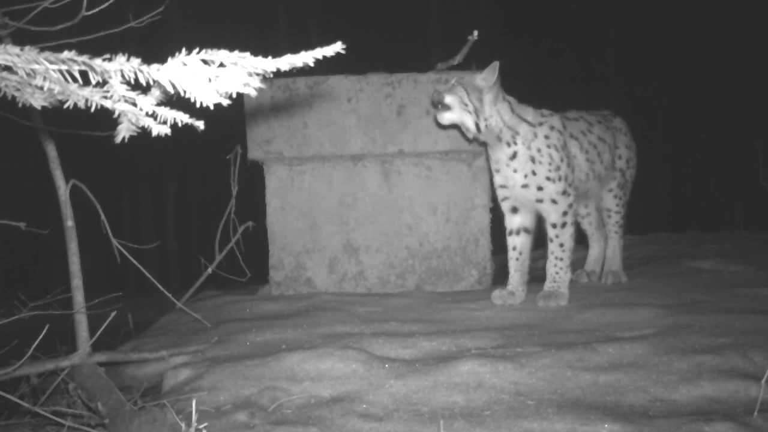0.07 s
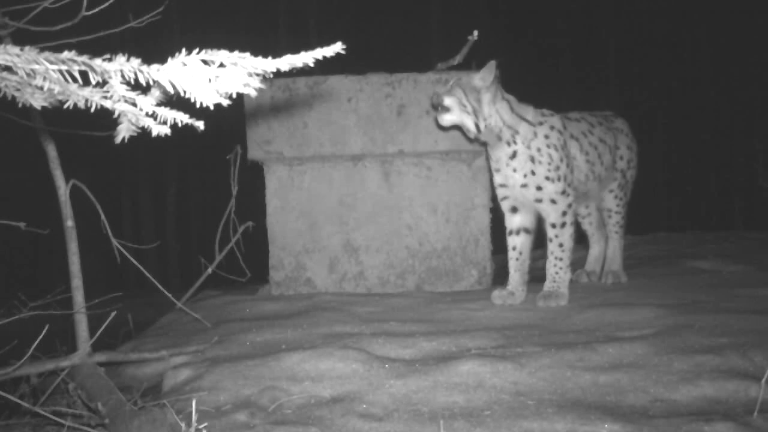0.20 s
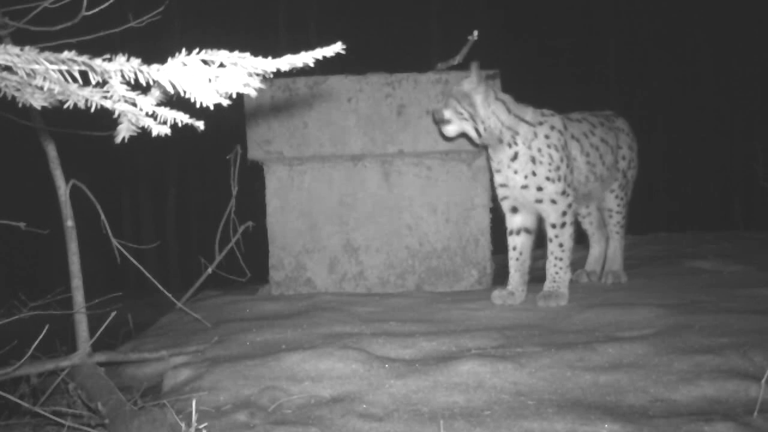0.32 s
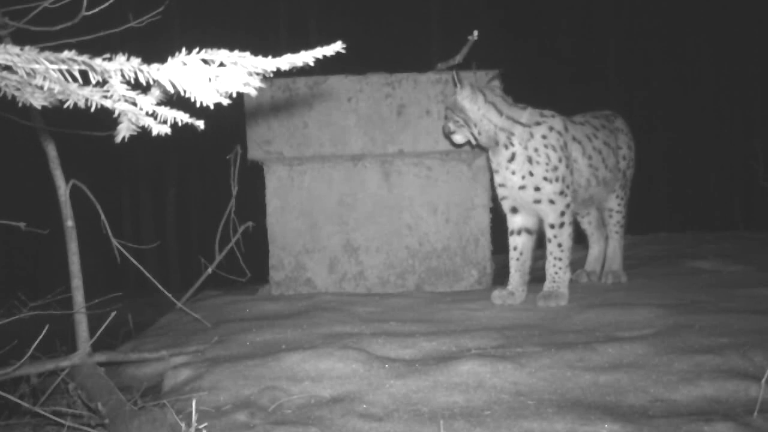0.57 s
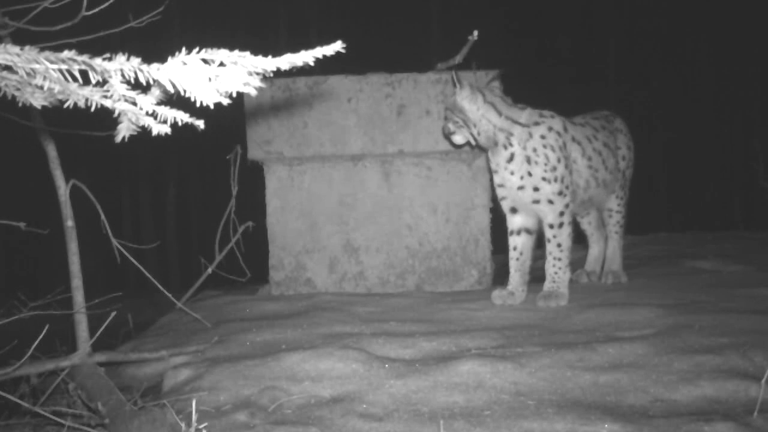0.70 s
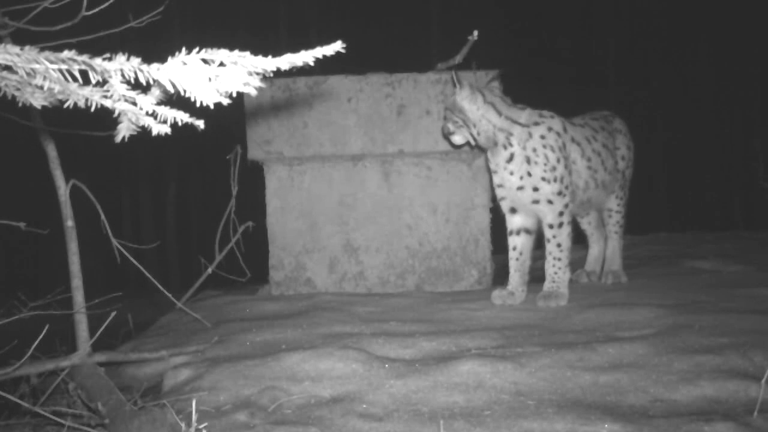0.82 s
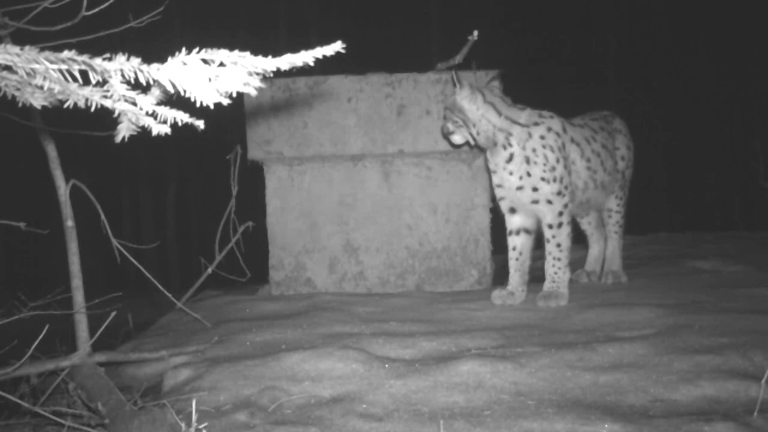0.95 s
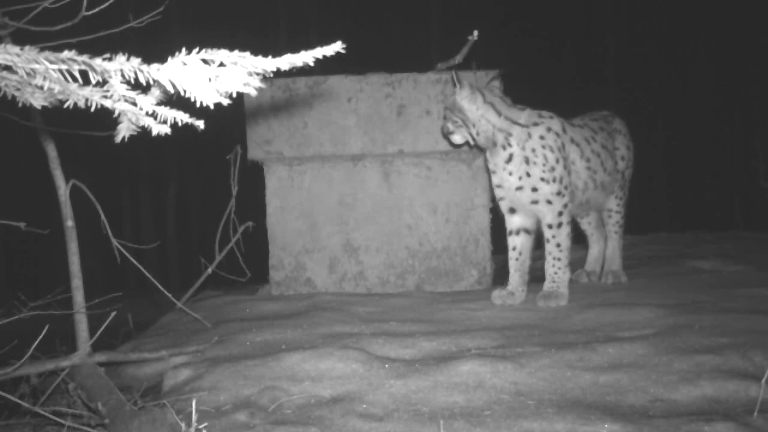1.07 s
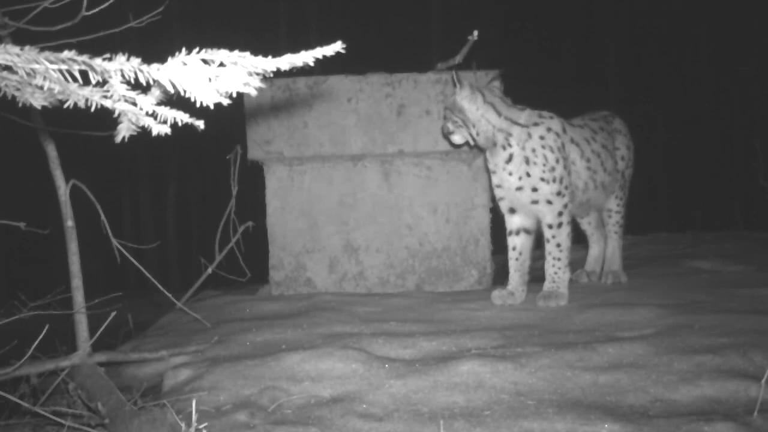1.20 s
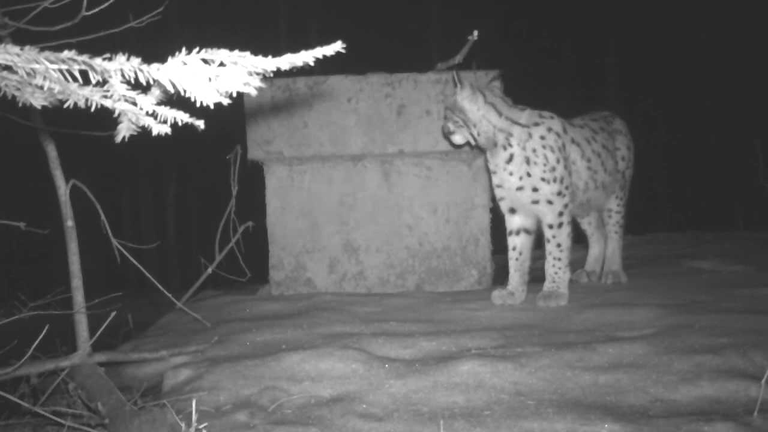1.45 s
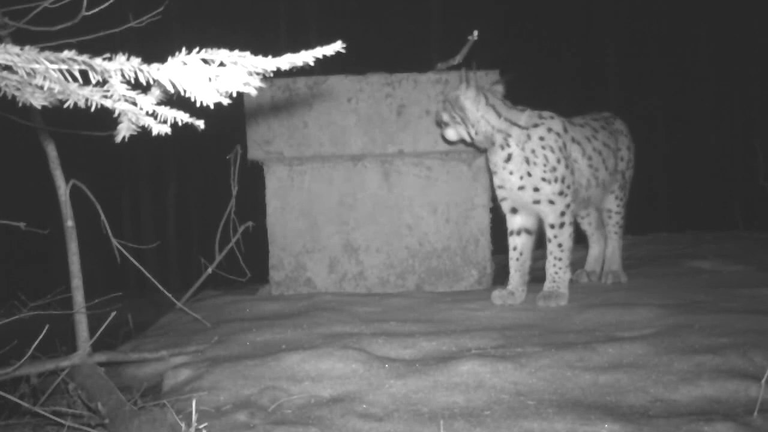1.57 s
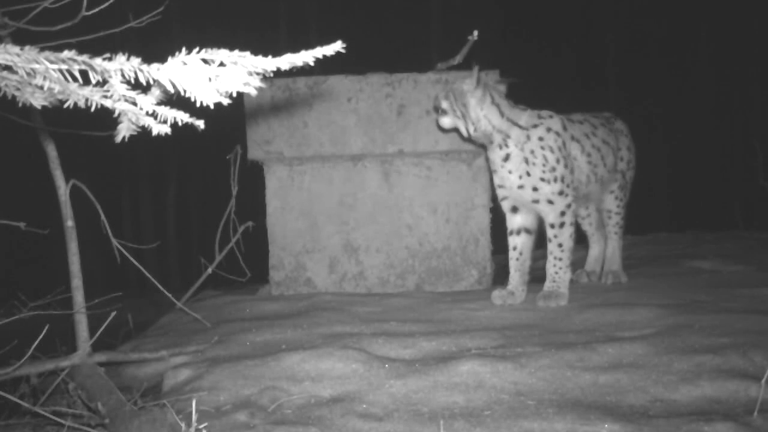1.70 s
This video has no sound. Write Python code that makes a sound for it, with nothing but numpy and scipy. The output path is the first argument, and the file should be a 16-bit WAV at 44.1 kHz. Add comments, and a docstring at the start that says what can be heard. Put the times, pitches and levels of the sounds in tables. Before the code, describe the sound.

A lynx gives one short, hoarse call close to the microphone, outdoors at night. It rises, breaks into a rasp, then sinks and fades on a brief clear note. Steady hiss and soft, rapid electronic ticks run throughout.

```python
"""A lynx gives one hoarse call at night, close to a trail camera.
Its vocal folds chop its breath into uneven puffs, which ring in its throat and mouth.
The voice rises, breaks into a rasp with a thin whistle, then sinks and clears as the mouth closes.
The camera's electronics hiss and tick softly, about eight down-and-up pairs of ticks a second."""
import sys
import numpy as np
from scipy import signal
from scipy.fft import rfft, irfft
from scipy.io import wavfile
from scipy.ndimage import uniform_filter1d

SR = 44100
rng = np.random.default_rng(int(sys.argv[2]) if len(sys.argv) > 2 else 0)


def waveform_to_disk(signal):
    """Save audio, clipped to [-1, 1], as 16-bit WAV at the path in sys.argv[1]."""
    frames = np.transpose(np.atleast_2d(signal))
    scaled = np.clip(frames, -1, 1) * 32767
    samples = np.round(scaled).astype(np.int16)
    wavfile.write(sys.argv[1], SR, samples)


N = 77175
TIME = np.arange(N) / SR

# Tone of the hiss, low to high: frequency_hz, relative_db
HISS_TONE = [(20, 20), (60, 8.5), (120, 13), (250, 8), (500, 5), (1000, 2), (2000, 0.5), (4000, -2),
             (5500, -5), (6600, -8), (8200, -10)]
# The two repeating electrical steps: start_s, direction (-1 down, 1 up), level_db
TICK_STEPS = [(.0468, -1, -33.5), (0.0872, 1, -31)]
# Pitch of the voice: time_s, pitch_hz
VOICE_PITCH = [(.18, 255.2), (.21, 293), (.24, 380.6), (.283, 422.1), (.296, 580), (.35, 554.1),
               (.43, 497.5), (.47, 427), (.5, 409.9), (.55, 383), (.6, 349), (.65, 330)]
# How hoarse the voice is: time_s, roughness (0 to 1)
ROUGHNESS = [(.17, .7), (.24, .55), (.31, .48), (.36, 0.7), (.45, .6), (.49, 0.5), (.54, .58), (.59, 0.4),
             (.66, 0.4)]
# A second vibration of the folds as the voice breaks: time_s, pitch_hz, relative_db
SECOND_VOICE = [(.28, 427.7, -16), (.31, 421.6, -3.5), (.335, 385, -8.5), (.37, 370.6, -4.5),
                (.46, 360.7, -3), (.485, 345, -10)]
# Strength of the main part of the call: time_s, level_db
CALL_LEVEL = [(.15, -65), (.176, -44.5), (.19, -32.5), (.238, -19), (.276, -22), (.283, -14.5),
              (.324, -16.5), (.344, -19.5), (.4, -22.5), (.424, -21), (.456, -27), (.495, -24.5),
              (.515, -31.5), (.565, -31.5), (.6, -32), (.63, -40.5), (.66, -55.5)]
# Strength of the call's treble: time_s, level_db
TREBLE_LEVEL = [(.17, -75.5), (.24, -53), (.32, -44.5), (.42, -50), (.47, -51), (.55, -55.5), (.66, -65)]
# How far the mouth is open: time_s, opening (0 to 1)
MOUTH_OPENING = [(.16, 0.6), (.205, 0.54), (.245, 0.58), (.3, 0.92), (.4, 0.96), (.5, 0.19), (.56, 0.46),
                 (.6, 0.04)]
# Where the throat rings: frequency_hz, width_hz, mouth_open_db, mouth_closed_db
THROAT_RINGS = [(1096, 30, -7, -31), (1257, 41, -11, -7), (1344, 37, 4.5, -25.5), (1419, 80, 0.5, -8.5),
                (1495, 81, -1.5, -4.5), (1698, 115, 1, -5), (1765, 32.5, 0, 4.5), (1926, 58, -0.5, -10),
                (2030, 49, 2.5, -11.5), (2095, 55, -22, -19.5)]
# The bright, gliding ring of the mouth: time_s, frequency_hz, relative_db
MOUTH_RING = [(.19, 2780, -29), (.26, 2670, -16), (.305, 2684, -12), (.34, 2430, -4.5), (.42, 2396, -9),
              (.5, 2405, -14), (.55, 2450, -13.5), (.59, 2380, -30)]
# Where the voice rings in the treble: frequency_hz, width_hz, relative_db
TREBLE_RINGS = [(3624, 360, -2.5), (4580, 410, -7), (5120, 170, -2), (5470, 110, 3), (6010, 250, -2.5),
                (6656, 200, 1), (6844, 320, 2.5), (7800, 670, -10.5)]
# The two lowest tones of the voice: time_s, lowest_db, octave_above_db
LOW_TONES = [(.17, -51, -74), (.205, -56.5, -45.5), (.25, -63.5, -39), (.285, -63, -41.5), (.315, -40, -71),
             (.37, -49, -63), (.43, -42, -44), (.475, -44, -60.5), (.57, -44, -47), (.61, -45, -78),
             (.65, -61, -69)]
# Brief growls below the voice: middle_s, half_length_s, pitch_hz, level_db
LOW_GROWLS = [(0.397, .04, 227.4, -39), (0.659, 0.021, 225.7, -49.5)]
# Tone of the chesty rasp: frequency_hz, relative_db
CHEST_TONE = [(80, -9), (140, -3), (230, -0.5), (310, -11.5), (450, -3), (620, -7), (880, -1),
              (1020, -14.5), (1300, -33.5)]
# Strength of the chesty rasp: time_s, level_db
CHEST_RASP_LEVEL = [(.17, -60), (.23, -49), (.275, -48.5), (.31, -41), (.44, -41.5), (.48, -44.5),
                    (.56, -57), (.66, -62)]
# A thin whistle in the breath: time_s, pitch_hz, level_db
BREATH_WHISTLE = [(.25, 4800, -67), (.32, 4635, -49.5), (.38, 4604, -52), (.41, 4550, -55),
                  (.432, 4450, -46.5), (.46, 4400, -71.5)]
# The clear note that ends the call: time_s, pitch_hz, level_db
CLOSING_NOTE = [(.555, 1770, -43.5), (.582, 1775, -28.5), (.592, 1765, -31.5), (.604, 1727, -25.5),
                (.62, 1766, -39.5), (.636, 1770, -31.5), (.652, 1770, -53.5), (.675, 1770, -49.5),
                (.7, 1760, -70)]
# How much treble the camera lets through: frequency_hz, gain_db
CAMERA_TREBLE = [(6000, 0.5), (6900, -6), (7280, -14.5), (7480, -38), (7700, -16), (8000, -6.5),
                 (8250, -20.5), (8500, -49.5)]


def from_db(db):
    """Turn decibels into a number to multiply by."""
    return 10 ** (np.asarray(db) / 20)


def rms_one(x):
    """Scale a sound so its average strength (rms) is one."""
    return x / np.sqrt(np.mean(x ** 2) + 1e-20)


def curve(rows, column=1):
    """Join a table's points with straight lines, giving a value for every sample."""
    rows = np.array(rows)
    return np.interp(TIME, rows[:, 0], rows[:, column])


def envelope(rows, column=1):
    """Loudness that follows a decibel column, silent before and after the table."""
    return from_db(curve(rows, column)) * (TIME > rows[0][0]) * (TIME < rows[-1][0])


def shape_tone(x, points):
    """Turn each frequency up or down as a table says."""
    hz, db = np.transpose(points)
    bins_hz = np.maximum(np.arange(N + 1) * SR / (2 * N), 1)
    gain = from_db(np.interp(np.log(bins_hz), np.log(hz), db))
    return irfft(rfft(x, 2 * N) * gain)[:N]


def wobble(rate_hz):
    """A smooth random wobble of about size one; a higher rate makes it quicker."""
    smoothing = signal.butter(2, rate_hz, fs=SR, output="sos")
    return rms_one(signal.sosfilt(smoothing, rng.standard_normal(N)))


def ring(x, centre_hz, width_hz):
    """A resonance: keep a narrow band of sound around a centre that may glide."""
    turn = np.exp(2j * np.pi * np.cumsum(centre_hz) / SR)
    decay = np.exp(-np.pi * width_hz / SR)
    return (signal.lfilter([(1 - decay) ** 2], [1, -2 * decay, decay * decay], x / turn) * turn).real


def even_out(x, window_samples=600):
    """Hold a sound's strength near one from moment to moment."""
    return x / np.sqrt(np.abs(uniform_filter1d(x ** 2, window_samples)) + 1e-20)


def wavering_phase(pitch_hz, waver, rate_hz=110):
    """The running angle of a vibration whose pitch strays by the fraction `waver`."""
    return 2 * np.pi * np.cumsum(pitch_hz * (1 + waver * wobble(rate_hz))) / SR


def hiss(level_db=-49, crackles_per_s=14, crackle_db=-41.5, crackle_hz=260):
    """Steady microphone noise with a few faint crackles."""
    happens = rng.random(N) < crackles_per_s / SR
    clicks = happens * from_db(crackle_db + 2 * rng.standard_normal(N))
    crackle = signal.lfilter([1], [1, -np.exp(-2 * np.pi * crackle_hz / SR)], clicks + 1e-18)
    noise = rms_one(shape_tone(rng.standard_normal(N), HISS_TONE))
    return from_db(level_db) * noise - crackle


def ticks(period_s=.12555, spread_db=0.15, recovery_hz=25, damping=0.68):
    """Regular electrical steps leak into the microphone input and sag back to zero."""
    jumps = np.zeros(N)
    for start_s, direction, db in TICK_STEPS:
        at = (np.arange(start_s, (N - 1) / SR, period_s) * SR).astype(int)
        jumps[at] += direction * from_db(db + spread_db * rng.standard_normal(N)[at])
    speed = 2 * np.pi * recovery_hz
    sag = signal.bilinear([1, 0, 0], [1, 2 * damping * speed, speed * speed], SR)
    return signal.lfilter(*sag, np.cumsum(jumps))


def vocal_folds(pitch_hz, rough, waver=.045, flutter_db=5, flutter_hz=73, surge_db=2):
    """The folds let out uneven puffs of air, and rushing breath surges with each one."""
    phase = wavering_phase(pitch_hz, waver * rough)
    puff_count = np.floor(phase / (2 * np.pi))
    puffs = rms_one(np.diff(puff_count, prepend=0) - pitch_hz / SR)
    breath = rms_one(rng.standard_normal(N) * from_db(surge_db * np.cos(phase)))
    flutter = from_db(flutter_db * rough * wobble(flutter_hz))
    return ((1 - rough) * puffs + 0.98 * rough * breath) * flutter


def throat_and_mouth(buzz, band_hz=(1093, 2762), dulling=0.22):
    """The buzz rings in throat and mouth; closing lowers the ringing a little, less effort dulls it."""
    opening = curve(MOUTH_OPENING)
    shift = 1 + 0.01 * (opening - .7)
    effort_db = curve(CALL_LEVEL)
    tilt_db_per_octave = dulling * (effort_db - effort_db.max())
    main = np.zeros(N)
    for hz, width_hz, open_db, closed_db in THROAT_RINGS:
        db = closed_db + (open_db - closed_db) * opening + tilt_db_per_octave * np.log2(hz / 1700)
        main += from_db(db) * ring(buzz, hz * shift, width_hz)
    main += from_db(curve(MOUTH_RING, column=2)) * ring(buzz, curve(MOUTH_RING), width_hz=111)
    main = signal.sosfilt(signal.butter(6, band_hz, "band", fs=SR, output="sos"), main)
    treble = sum(from_db(db) * ring(buzz, hz * shift, width_hz) for hz, width_hz, db in TREBLE_RINGS)
    return even_out(main) * envelope(CALL_LEVEL) + even_out(treble) * envelope(TREBLE_LEVEL)


def low_voice(pitch_hz, rough, waver=.03):
    """The two lowest tones of each vibration of the folds, with brief growls below them."""
    phase = wavering_phase(pitch_hz, waver * rough)
    tones = envelope(LOW_TONES) * np.sin(phase) + envelope(LOW_TONES, column=2) * np.sin(2 * phase)
    second_phase = wavering_phase(curve(SECOND_VOICE), waver)
    second_gain = from_db(-48) * envelope(SECOND_VOICE, column=2)
    tones += second_gain * (np.sin(second_phase) + np.sin(2 * second_phase))
    for middle_s, half_length_s, hz, db in LOW_GROWLS:
        swell = np.exp(-((TIME - middle_s) / half_length_s) ** 2)
        tones += from_db(db) * swell * np.sin(2 * np.pi * hz * TIME)
    return np.sqrt(2) * tones


def chest_rasp():
    """A low, chesty noise swells and fades under the voice."""
    return rms_one(shape_tone(rng.standard_normal(N), CHEST_TONE)) * envelope(CHEST_RASP_LEVEL)


def whistle(flutter_db=3, flutter_hz=73):
    """The breath makes a thin, fluttering whistle that sinks at the height of the call."""
    tone = even_out(ring(rng.standard_normal(N), curve(BREATH_WHISTLE), width_hz=37))
    return tone * envelope(BREATH_WHISTLE, column=2) * from_db(flutter_db * wobble(flutter_hz))


def closing_note():
    """As the mouth closes, one high tone of the voice holds on and rings out almost pure."""
    phase = wavering_phase(curve(CLOSING_NOTE), waver=0.0084)
    return np.sqrt(2) * envelope(CLOSING_NOTE, column=2) * np.sin(phase)


def lynx():
    """The whole call; in its middle the folds vibrate at two clashing pitches."""
    pitch_hz, rough = curve(VOICE_PITCH), curve(ROUGHNESS)
    buzz = vocal_folds(pitch_hz, rough)
    buzz += envelope(SECOND_VOICE, column=2) * vocal_folds(curve(SECOND_VOICE), rough=.3)
    return throat_and_mouth(buzz) + low_voice(pitch_hz, rough) + chest_rasp() + whistle() + closing_note()


def scene():
    """The call over the camera's own noise, in one channel."""
    return (lynx() + ticks() + hiss())[None]


def record(dry, cutoff_hz=8400):
    """The camera dulls the high treble and cuts off the very top."""
    treble_cut = signal.ellip(10, .1, 80, cutoff_hz, fs=SR, output="sos")
    return signal.sosfilt(treble_cut, shape_tone(dry[0], CAMERA_TREBLE))[None]


dry = scene()
out = record(dry)
waveform_to_disk(out)
```